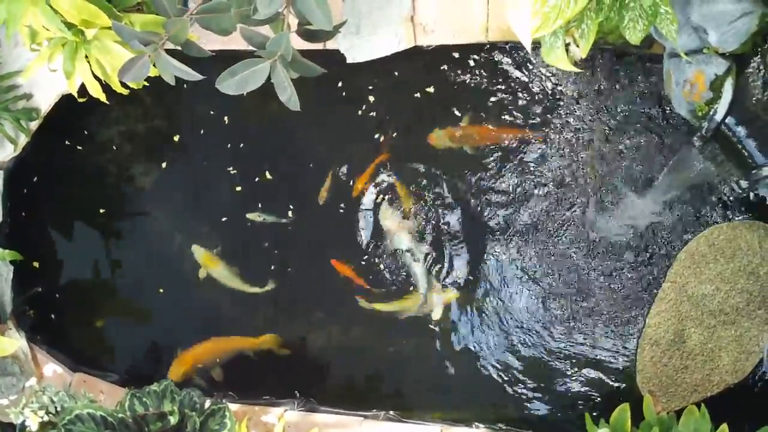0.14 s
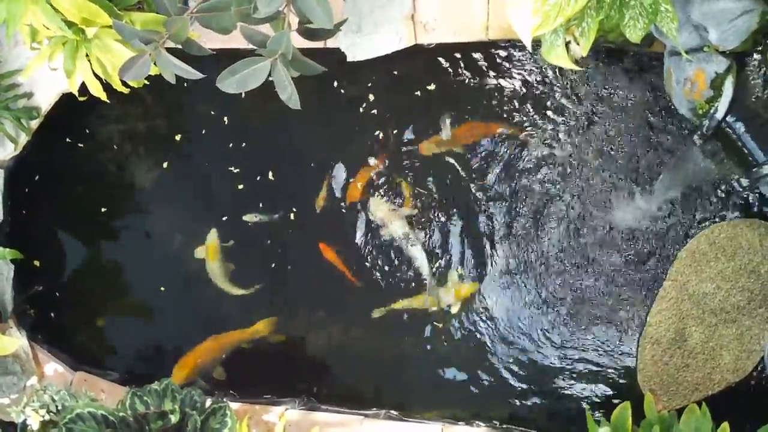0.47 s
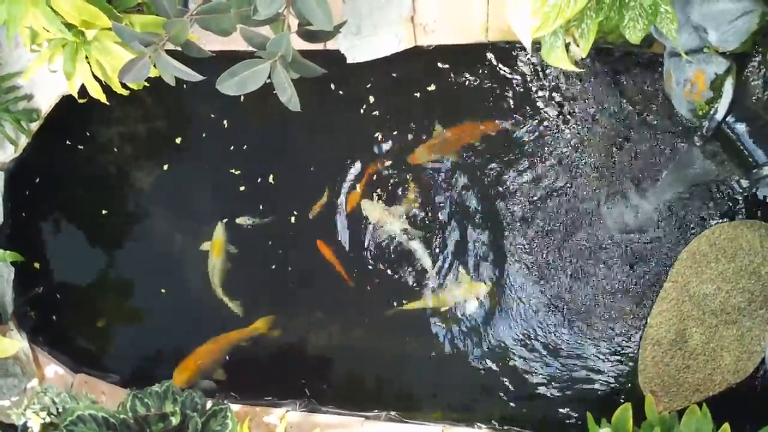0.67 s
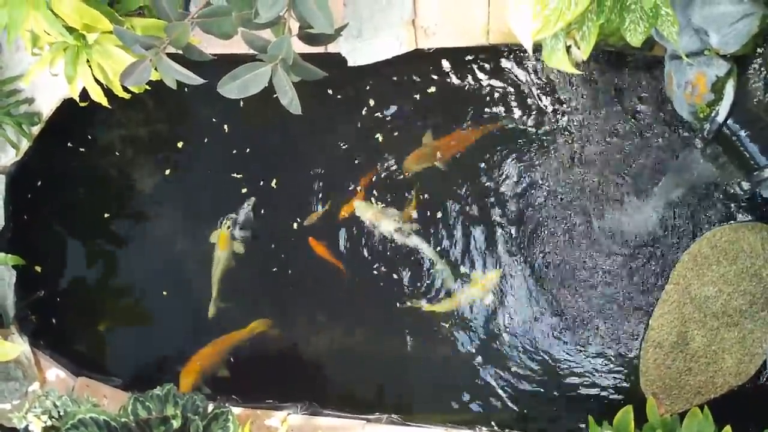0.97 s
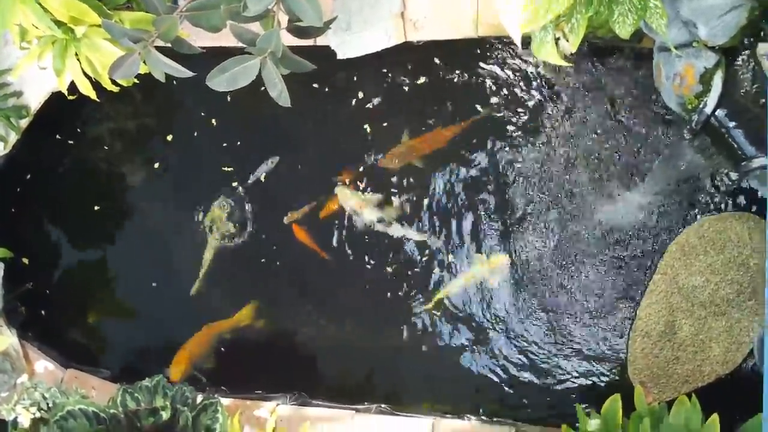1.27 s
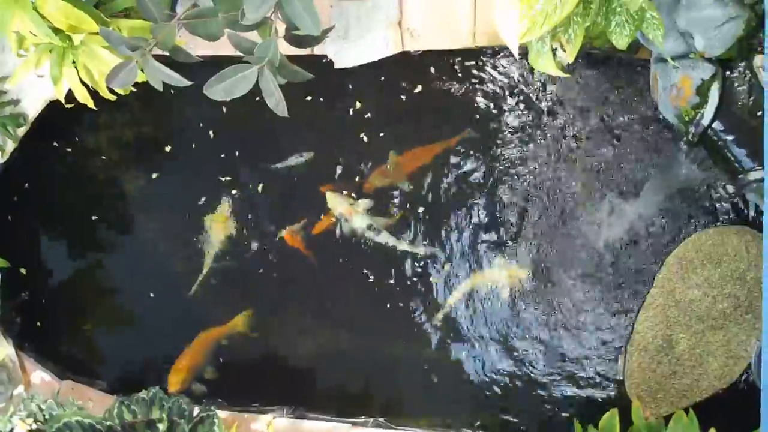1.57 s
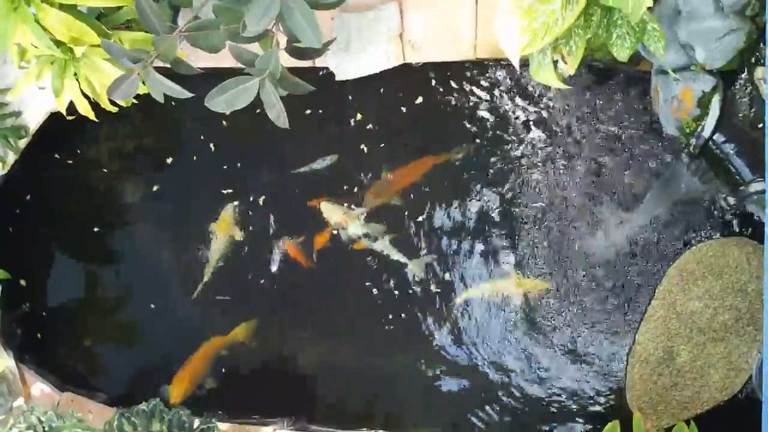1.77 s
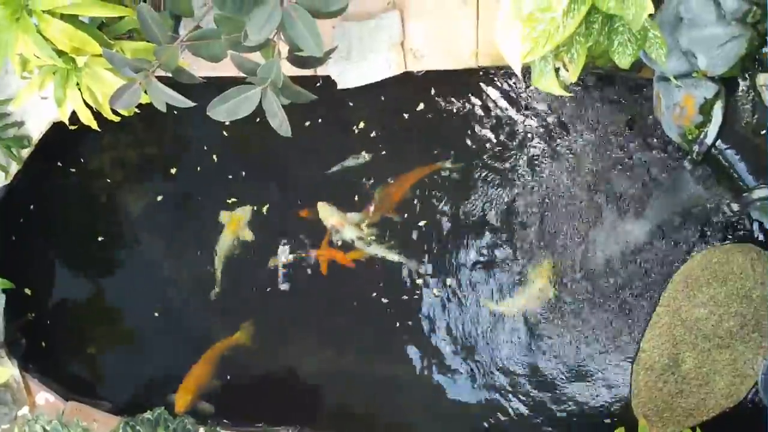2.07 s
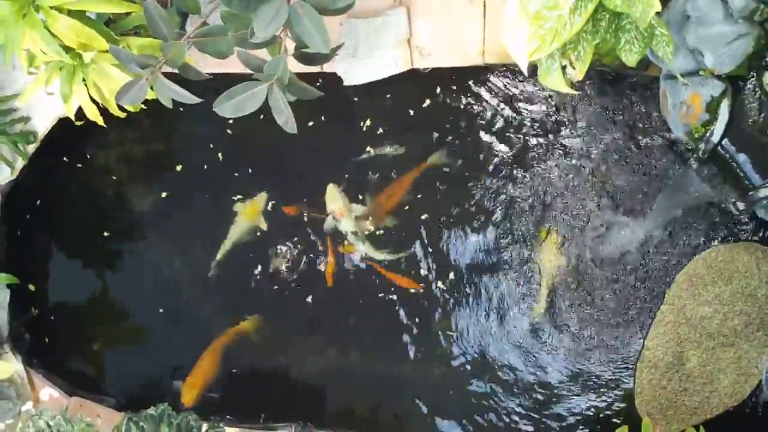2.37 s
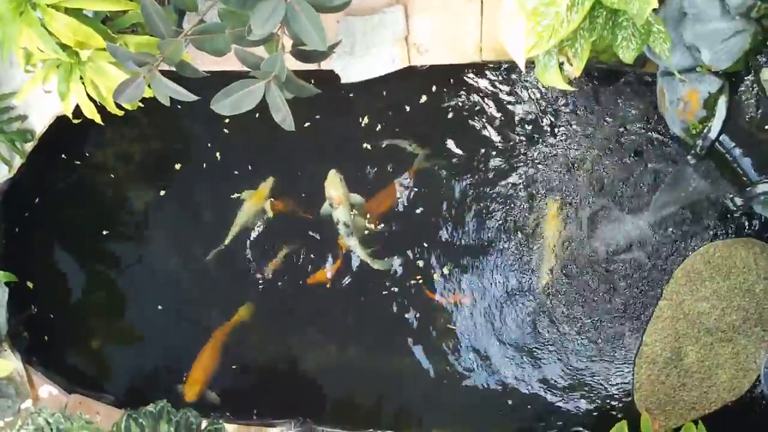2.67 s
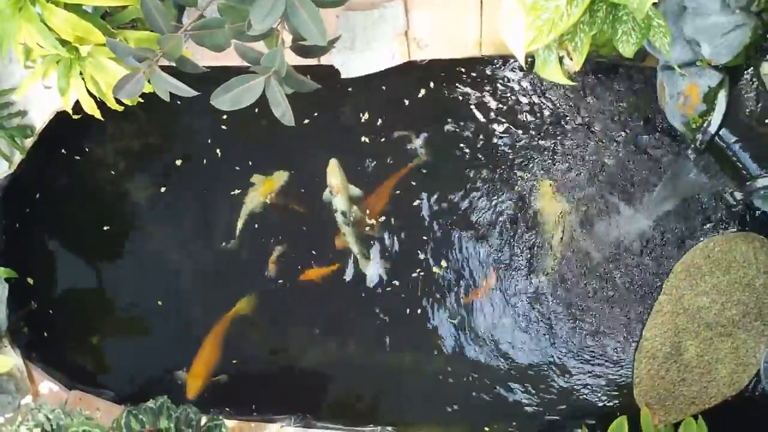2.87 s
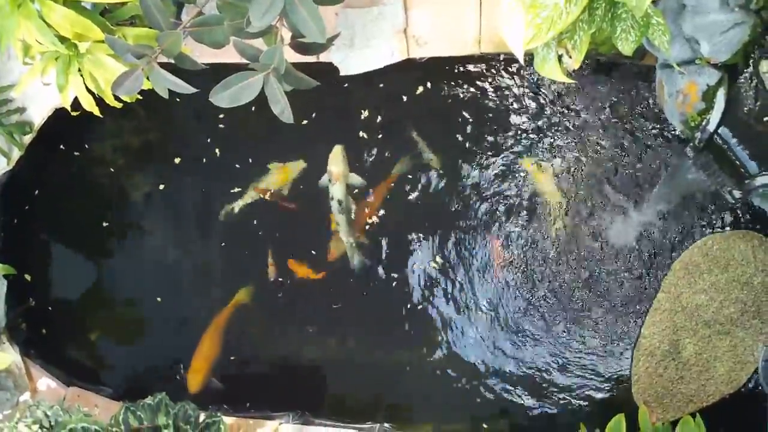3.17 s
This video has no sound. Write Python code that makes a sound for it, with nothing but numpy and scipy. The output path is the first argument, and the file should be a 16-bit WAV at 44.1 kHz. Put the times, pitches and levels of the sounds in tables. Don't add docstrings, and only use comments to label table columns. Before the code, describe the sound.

A small waterfall rushes steadily into a garden pond, bright hiss with crisp droplet pops.

```python
import sys
import numpy as np
from scipy import signal
from scipy.io import wavfile

SR = 44100
rng = np.random.default_rng(int(sys.argv[2]) if len(sys.argv) > 2 else 0)


def rack_gain(trim_db):
    fader = np.asarray(trim_db, float)
    return 10 ** (fader / 20)


def wav_record(signal):
    frames = np.transpose(np.atleast_2d(signal))
    bounded = np.clip(frames, -1, 1)
    quanta = np.round(bounded * 32767).astype(np.int16)
    wavfile.write(sys.argv[1], SR, quanta)


N = 147294


def in_time(rows):
    return np.interp(np.arange(N) / SR, *np.transpose(rows))


def at_hz(points, hz):
    points_hz, points_db = np.transpose(points)
    return np.interp(np.log(hz), np.log(points_hz), points_db)


def rms_one(x):
    return x / np.sqrt(np.mean(x ** 2) + 1e-20)


def drift(rate):
    step = 40
    r = np.exp(-2 * step * np.pi * rate / SR)
    slow = signal.lfilter([1], [1, -2 * r, r * r], rng.standard_normal(N // step + 2002))
    slow = rms_one(slow[2000:])
    return np.interp(np.arange(N) / step, np.arange(len(slow)), slow)


def banded_noise(spectrum, edges, shared_db, own_db):
    out, together, white = 0, drift(7.4), rng.standard_normal((2, N + SR))
    for k, (low, high) in enumerate(zip(edges, edges[1:])):
        band_pass = signal.butter(2, [low, high], "band", fs=SR, output="sos")
        band = signal.sosfilt(band_pass, white[k % 2])[SR:]
        level_db = at_hz(spectrum, np.sqrt(low * high)) + shared_db * together + own_db * drift(8.6)
        out = out + band * rack_gain(level_db)
    return rms_one(out)


def ring(clicks, hz, cycles, swell=True):
    r, w = rack_gain(-60 * hz / (cycles * SR)), 2 * np.pi * hz / SR
    poles = [1, -2 * r * np.cos(w), r * r]
    once = signal.lfilter([0, np.sin(w)], poles, clicks + 1e-18)
    if not swell:
        return once
    return signal.lfilter([2 * np.e * (1 - r) * np.sin(w)], poles, once)


def scattered(clicks):
    # delay in seconds, level in dB.
    returns = [
        (.0074, -8),
        (0.0157, -10.5),
    ]
    t60_s, tail_db, tail_start_s = 0.15, 0.06, 0.003
    rim_s, rim_spread, rim_db = 0.0023, 0.07, -3.5

    r = rack_gain(-120 / (t60_s * SR))
    late = np.roll(clicks, int(tail_start_s * SR))
    power = signal.lfilter([1 - r], [1, -r], late ** 2 + 1e-18)
    tail = rack_gain(tail_db) * np.sqrt(power) * rng.standard_normal(len(clicks))

    rim_delay = int(rim_s * SR * (1 + rim_spread * rng.uniform(-1, 1)))
    early = rack_gain(rim_db) * np.roll(clicks, rim_delay)
    for s, db in returns:
        early = early + rack_gain(db) * np.roll(clicks, int(s * SR))
    return clicks + early + tail


def grains(per_s, pitches, cycles, spread_db, clump_db, tilt_db):
    sizes = rack_gain(spread_db * np.minimum(rng.exponential(1, N), 3.2)) * rng.choice([-1, 1], N)
    born = rng.random(N) < per_s * rack_gain(clump_db * drift(18)) / SR
    first, second = rng.integers(0, len(pitches), (2, N))
    out = 0
    for k, hz in enumerate(pitches):
        clicks = sizes * born * ((first == k) | (second == k))
        tilt = rack_gain(tilt_db * np.log2(hz / pitches[0]))
        out = out + tilt * ring(scattered(clicks), hz, cycles)
    return rms_one(out)


def drops(rows, cycles, swell=False):
    arrive_s, burst_s, burst_db = 0.001, 0.00026, -3
    out, t = np.zeros(N + SR), np.arange(SR // 4) / SR
    for s, db, hz in rows:
        start = int((s + arrive_s) * SR)
        ragged = rng.standard_normal(len(t)) * np.exp(-t / burst_s)
        ragged = rack_gain(burst_db) * ragged / np.sqrt(burst_s * SR / 2)
        out[start:start + len(t)] += rack_gain(db) * ring(scattered((t == 0) + ragged), hz, cycles, swell)
    return out[:N]


def falling_water():
    # time in seconds, level in dB.
    flow = [
        (0.0, -36),
        (0.44, -34),
        (1.17, -34),
        (1.74, -34),
        (2.69, -35),
        (3.34, -33),
    ]
    # frequency in Hz, level in dB per Hz.
    rush_spectrum = [
        (150, -32),
        (250, -8),
        (591, -4),
        (727, -4.5),
        (1160, 0.5),
        (1280, -7),
        (2510, 1),
        (9450, -3.5),
        (15300, -13),
    ]
    rush = banded_noise(rush_spectrum, np.geomspace(180, 17000, 15), shared_db=-0.17, own_db=2.05)
    spray = grains(per_s=950, pitches=np.geomspace(2200, 12000, 14), cycles=8.7,
                   spread_db=6.0, clump_db=2.0, tilt_db=4.5)
    return rack_gain(in_time(flow) - 0.83) * (rack_gain(-2.6) * rush + rack_gain(-5.5) * spray)


def churning_bubbles():
    # time in seconds, level in dB.
    churn = [(0.0, -37), (0.47, -57), (0.67, -42.5), (0.69, -43.5), (0.94, -43.5), (0.95, -35), (0.99, -40),
             (1.24, -42.5), (1.27, -50.5), (2.77, -41.5), (3.22, -43), (3.3, -52.5), (3.31, -54),
             (3.34, -50)]
    bubbles = grains(per_s=330, pitches=np.geomspace(450, 2600, 16), cycles=33.4,
                     spread_db=4.0, clump_db=2.5, tilt_db=6.0)
    return rack_gain(in_time(churn) - 5.0) * bubbles


def rumble():
    # frequency in Hz, level in dB per Hz.
    rumble_spectrum = [
        (26, -30),
        (45, -9),
        (75, -9.5),
        (162, -13.5),
        (199, -19.5),
        (227, -16.5),
        (300, -18),
        (390, -50),
        (660, -120),
    ]
    # time in seconds, level in dB.
    breeze = [(0.0, -41), (0.35, -50), (0.45, -50), (1.19, -41.5), (1.65, -52), (2.11, -40), (2.15, -50),
              (2.33, -34.5), (2.38, -42), (2.46, -23), (2.6, -48), (2.74, -27.5), (2.8, -48), (3.34, -42)]
    # time in seconds, level in dB.
    drone_level = [
        (0.0, -58),
        (0.14, -36.5),
        (2.33, -43.5),
        (2.37, -34),
        (2.62, -48),
        (2.71, -34.5),
        (2.9, -42.5),
        (3.34, -40),
    ]
    drone_hz, drone_width_hz = 34.24, 9.32

    lumps = banded_noise(rumble_spectrum, np.geomspace(8, 27, 3), shared_db=-4.5, own_db=0.5)
    lumps = rack_gain(in_time(breeze)) * lumps
    phase = 2 * np.pi * np.cumsum(drone_hz + drone_width_hz / 2 * drift(6.3)) / SR
    drone = rack_gain(in_time(drone_level) - 1.0 + 0.86 * drift(14.0)) * np.sin(phase)
    far = rack_gain(-48.5) * banded_noise(rumble_spectrum, np.geomspace(45, 300, 8), shared_db=-0.8, own_db=-1.1)
    side_spectrum = [(12, 0), (50, -4), (160, -21), (400, -30)]  # Hz, dB per Hz
    side = rack_gain(-64) * banded_noise(side_spectrum, np.geomspace(10, 420, 8), shared_db=0, own_db=1)
    return lumps + drone + far + side * np.array([[1], [-1]])


def popping_drops():
    # start in seconds, peak in dB, pitch in Hz.
    splats = [(0.3536, -21.5, 5550), (0.6444, -20, 6700), (1.2511, -18.5, 8470), (1.3497, -20, 7660),
              (1.5, -30, 6400), (1.7294, -22, 7070), (2.179, -20.5, 6900), (2.265, -24, 5500),
              (2.4299, -28, 6400), (2.929, -25, 6530), (3.237, -26, 5400), (3.2504, -23, 6600),
              (3.2665, -25, 4400), (0.0323, -24, 4030), (0.0383, -21, 9170), (0.1999, -26, 6880),
              (0.2783, -37, 3230), (0.3157, -29, 6400), (0.3411, -17, 9110), (0.41, -23, 9160),
              (0.5477, -18, 10100), (0.7008, -30, 6900), (0.9462, -26, 8720), (1.0036, -24, 8110),
              (1.1842, -20, 9400), (1.2516, -25, 5400), (1.287, -21, 6050), (1.3672, -32, 8000),
              (1.44, -26, 8300), (1.497, -23, 4100), (1.5404, -27, 7410), (1.6372, -29, 8060),
              (1.657, -27.5, 4500), (1.6926, -18, 7480), (1.745, -23, 5800), (1.923, -20, 5400),
              (1.9979, -22, 8840), (2.1505, -21, 7490), (2.188, -30, 3320), (2.195, -27, 3750),
              (2.2608, -32, 7430), (2.28, -21.5, 4040), (2.4942, -35, 2980), (2.7791, -27, 8420),
              (2.9078, -20, 5800), (3.0949, -26, 9700)]
    # start in seconds, peak in dB, pitch in Hz.
    spits = [(0.0508, -20, 13100), (0.1715, -17, 12500), (0.2805, -18, 11900), (0.409, -24, 12700),
             (0.4723, -34, 11200), (0.5721, -18, 13000), (0.6449, -19, 12800), (0.6883, -24, 12400),
             (1.0041, -22, 13600), (1.102, -37, 11200), (1.1842, -19, 12500), (1.2351, -16, 13400),
             (1.286, -18, 12600), (1.3506, -18.5, 13500), (1.4169, -14, 12400), (1.5803, -32, 12300),
             (1.693, -22.5, 11300), (2.2623, -23, 12000), (2.6773, -19, 11200), (2.9297, -23, 11200)]
    # start in seconds, peak in dB, pitch in Hz.
    pops = [(0.1446, -25.5, 3630), (0.1715, -23.5, 6960), (0.2129, -20.5, 5130), (0.2438, -20, 7150),
            (0.4314, -19.5, 4500), (0.4723, -22, 9800), (0.6883, -17, 9910), (0.879, -15.5, 7060),
            (0.9298, -19, 4500), (0.9785, -19, 5360), (1.004, -30, 4200), (1.0994, -19, 9750),
            (1.1842, -20.5, 4400), (1.2502, -18, 9900), (1.287, -34, 3260), (1.3498, -25, 3680),
            (1.4167, -14, 9800), (1.5406, -25, 3950), (1.6951, -25, 3900), (1.8522, -23.5, 3100),
            (1.9227, -16.5, 10100), (2.151, -19.5, 3200), (2.3348, -18.5, 8650), (2.6768, -19, 8200),
            (2.808, -17, 9100), (3.1886, -20, 6800), (3.2427, -16, 4400)]
    return rack_gain(-0.8) * (drops(pops, cycles=18.0) + drops(spits, cycles=14.0)
                        + rack_gain(0.5) * drops(splats, cycles=14.4))


def gulping_bubbles():
    # start in seconds, peak in dB, pitch in Hz.
    gulps = [(.21, -25.5, 2330), (.6, -31, 1480), (.66, -31, 1830), (.724, -28, 2010), (.943, -24, 1020),
             (.95, -37, 540), (.95, -29, 1650), (1.16, -28, 1600), (1.2, -28, 1620), (1.4, -30, 493),
             (1.402, -41, 710), (1.404, -33, 950), (1.86, -33.5, 990), (2.36, -31.5, 1300),
             (2.61, -33, 1260), (2.74, -29.5, 2000), (2.89, -30, 1140), (2.91, -42, 960), (3.148, -35, 547),
             (3.17, -31.5, 577), (3.196, -40, 510), (3.197, -28, 665), (3.238, -40, 1140),
             (3.262, -32, 1150), (3.277, -30, 1700), (3.293, -29, 1800)]
    return rack_gain(-7) * drops(gulps, cycles=9.8, swell=True)


def garden(x):
    # frequency in Hz, width in Hz, level in dB.
    hollows = [
        (619, 28, 4),
        (1145, 25, 1.5),
        (1506, 210, 2),
        (2420, 84, -10.5),
    ]
    wall_s, wall_db, wall_cut_hz = 0.00515, -17, 7400
    dull = signal.sosfilt(signal.butter(1, wall_cut_hz, fs=SR, output="sos"), x)
    out = x + rack_gain(wall_db) * np.roll(dull, int(wall_s * SR))
    for hz, width_hz, db in hollows:
        r = np.exp(-np.pi * width_hz / SR)
        poles = [1, -2 * r * np.cos(2 * np.pi * hz / SR), r * r]
        hollow = signal.lfilter([(1 - r * r) / 2, 0, (r * r - 1) / 2], poles, x)
        out = out + rack_gain(db - 4.5) * hollow
    return out


def scene():
    water = falling_water() + churning_bubbles() + popping_drops() + gulping_bubbles()
    return garden(water + rumble())


def low_pass(x):
    return signal.sosfilt(signal.butter(12, 15300, fs=SR, output="sos"), x)


def record(dry):
    cut = signal.sosfilt(signal.ellip(14, 0.5, 80, 15350, fs=SR, output="sos"), dry)
    return low_pass(cut + 0.0005)


dry = scene()
out = record(dry)
wav_record(out)
```